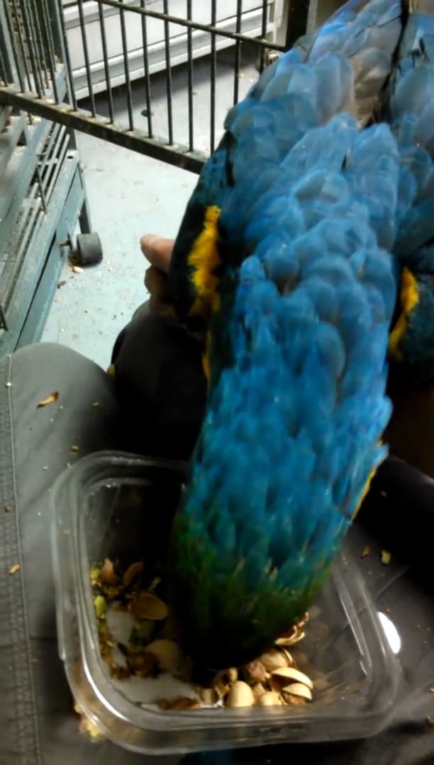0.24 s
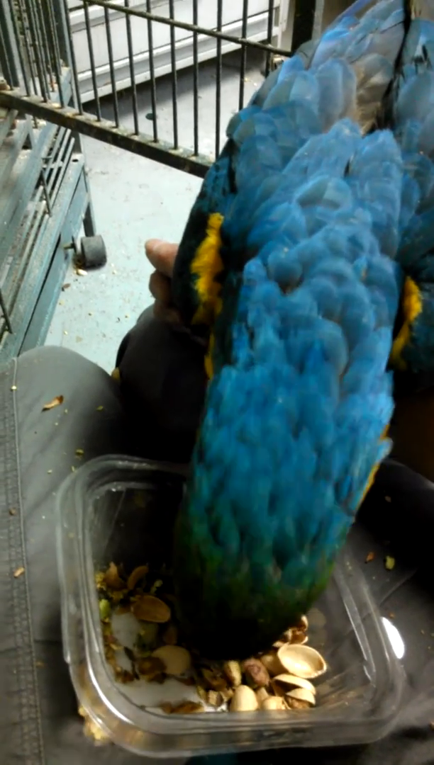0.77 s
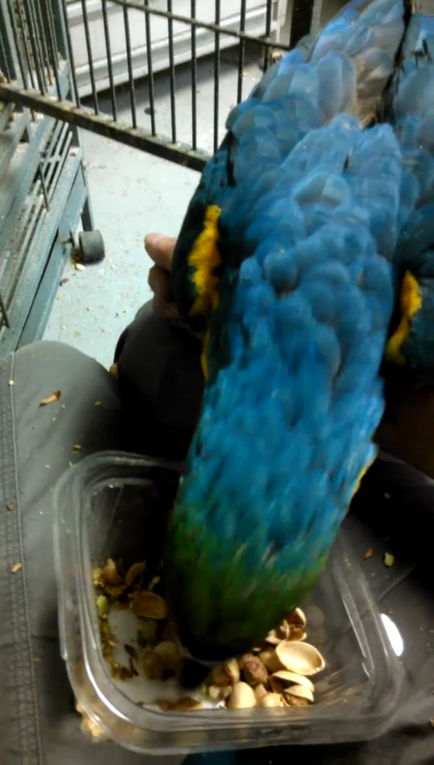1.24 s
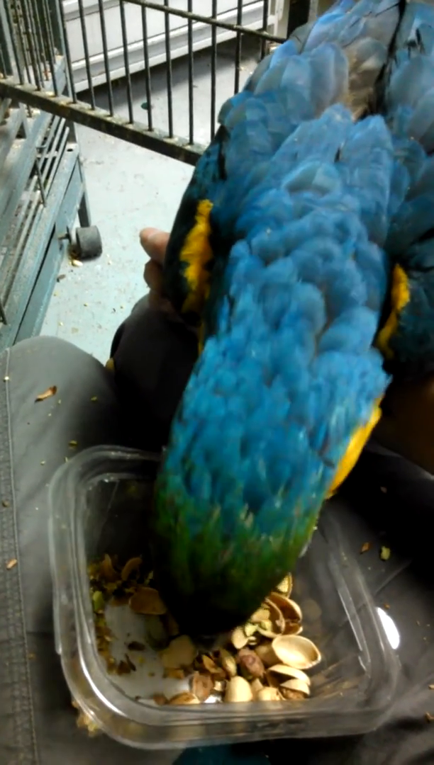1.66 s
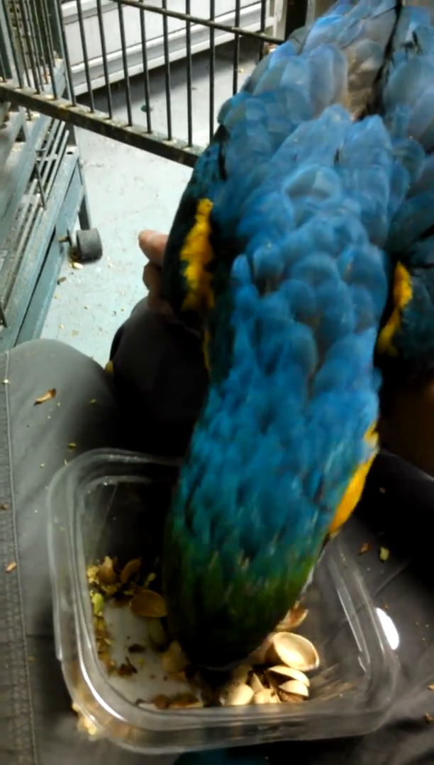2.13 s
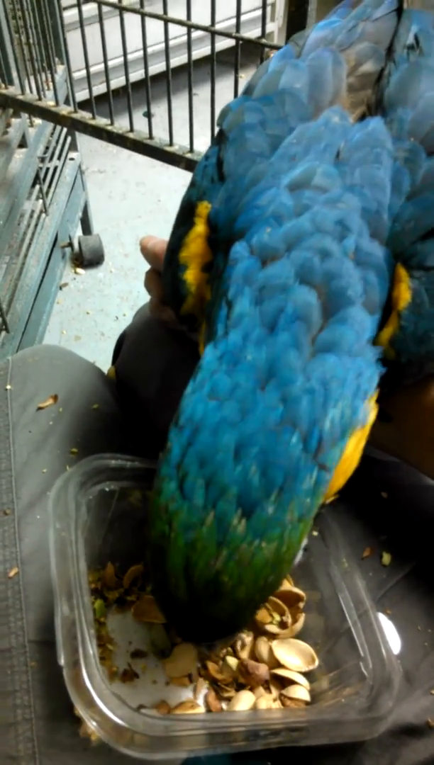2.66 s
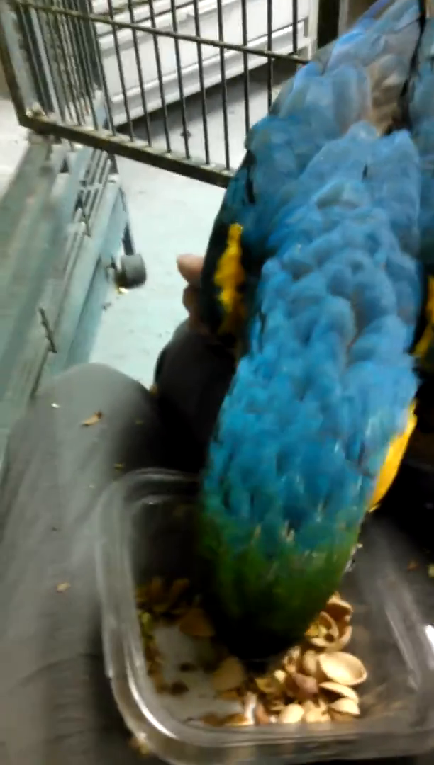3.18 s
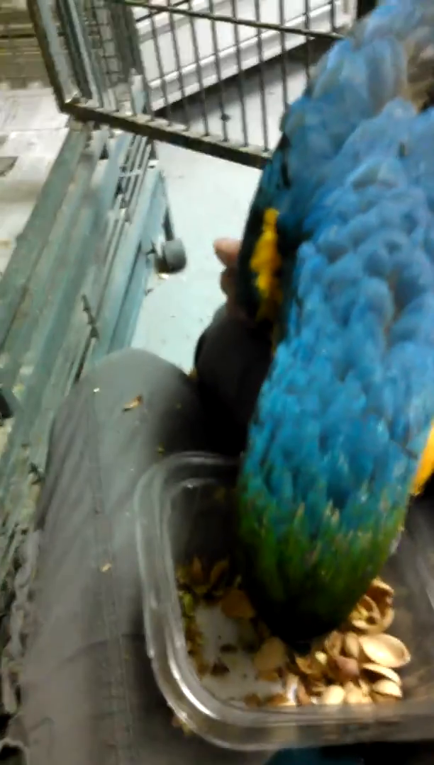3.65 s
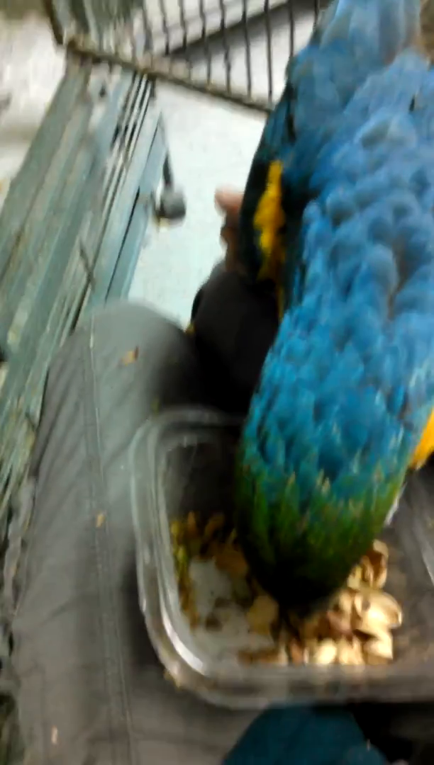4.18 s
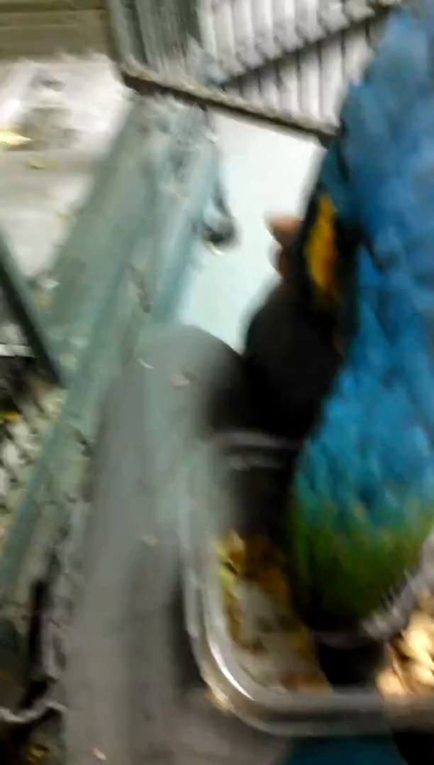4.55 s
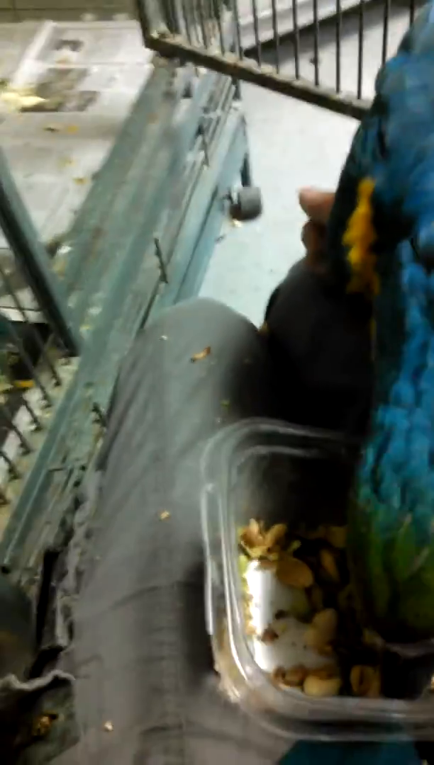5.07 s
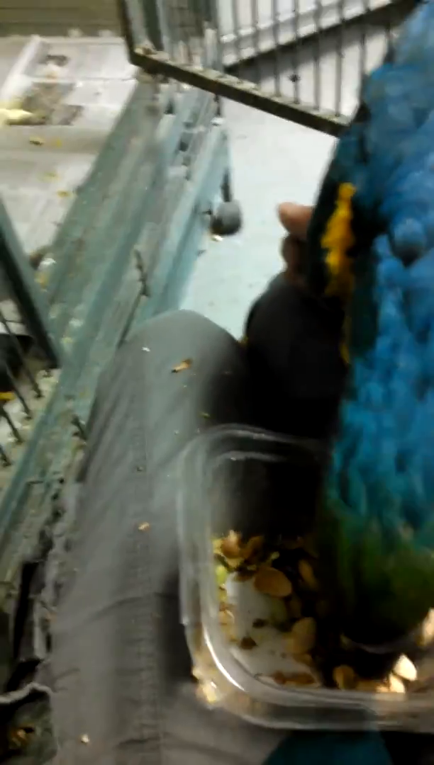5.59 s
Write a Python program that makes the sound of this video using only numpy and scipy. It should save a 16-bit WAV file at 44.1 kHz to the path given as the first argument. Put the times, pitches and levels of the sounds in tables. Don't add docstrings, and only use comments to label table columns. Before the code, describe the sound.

A brief turbulent screech opens, followed by two short chirps, dry rasps and a pure whistle. Three long harsh parrot squawks come next, the last breaking upward from a low note, with chirps and piping between. A gliding mew, a slow flapping growl and a short last call finish. Beak knocks in a plastic tub run through it, close to the microphone in a reverberant hard-walled room.

```python
import sys
import numpy as np
from scipy import signal
from scipy.fft import rfft, irfft, next_fast_len
from scipy.io import wavfile
from scipy.ndimage import uniform_filter1d, minimum_filter1d

SR = 44100
rng = np.random.default_rng(int(sys.argv[2]) if len(sys.argv) > 2 else 0)


def materialize(psi):
    bounded = np.clip(np.atleast_2d(psi).T, -1, 1)
    quanta = np.round(bounded * 32767).astype(np.int16)
    wavfile.write(sys.argv[1], SR, quanta)


def ratio_of_db(decibels):
    return 10 ** (np.asarray(decibels, float) / 20)


N = 256662

# (frequency [Hz], level [dB])
HUSH_SPECTRUM = [(30, -6), (60, -52.5), (120, -62.5), (350, -29.5), (700, -1), (1920, 0.5), (3430, -7.5),
                 (4510, -12), (7090, -23.5), (12000, -42.5)]
# (frequency [Hz], level [dB])
WALL_SIDE = [(60, -1.5), (110, -7), (200, -11), (380, -28), (700, -17), (1290, -19), (2380, -37),
             (4400, -28), (8120, -0.5), (15000, -2.5)]

# (time [s], peak level [dB], pitch [Hz])
TICKS = [
    (0.168, -47, 10800),
    (2.24, -50.5, 11170),
    (2.28, -56, 11140),
    (3.72, -35.5, 14150),
    (3.74, -38, 11670),
    (3.799, -38.5, 9980),
    (4.451, -43, 12200),
    (5.157, -51.5, 11600),
    (5.42, -55, 10500),
    (5.6, -58.5, 11350),
]
# (time [s], peak level [dB], pitch [Hz])
KNOCKS = [(0.55, -34, 497), (0.579, -24.5, 740), (0.609, -35, 503), (0.809, -36.5, 536), (0.988, -36, 675),
          (1.052, -40, 351.2), (1.335, -29.5, 510), (1.377, -21, 780), (2.039, -18.5, 540),
          (2.187, -38.5, 344), (2.239, -32.5, 316), (2.276, -31.5, 402), (2.953, -16, 645),
          (2.989, -10.5, 780), (3.034, -19.5, 610), (3.508, -30, 740), (3.744, -17, 790), (3.768, -12, 594),
          (3.96, -21, 514), (3.979, -13, 810), (4.877, -47, 614)]

# (start [s], length [s], level [dB], flap rate [1/s], treble against bass [dB])
RASPS = [
    (0.339, 0.093, -32, 108, -23),
    (0.466, 0.17, -22, 44, -6),
    (0.789, .3, -22.5, 108, -5.5),
    (1.299, 0.28, -27, 75, -32),
    (2.101, 0.25, -24, 70, -15),
    (3.198, 0.15, -22.5, 120, -12),
    (3.399, .14, -18, 210, -6.5),
    (3.656, 0.33, -25, 111, -11.5),
    (4.449, 0.28, -20, 100, -2.5),
    (4.998, 0.15, -33, 97, -23.5),
]
# (start [s], length [s], level [dB],
# flap rate [1/s], treble against bass [dB])
SCREECH = (0.0, .185, -23, 111, 0)
GROWL = (5.13, 0.6, -24, 27, -5)
# (frequency [Hz], level [dB])
RASP_THROAT = [(150, -79), (330, -45), (782, -13), (908, -21.5), (1140, -9.5), (1310, -2), (1970, -0.5),
               (2070, -6.5), (3030, 5.5), (4980, -12.5), (6180, -18.5), (13000, -46)]
SCREECH_THROAT = [(240, -64), (400, -47), (638, -11), (1360, -17), (1620, -6.5), (2540, -9), (3260, 0.5),
                  (3880, -29.5), (6100, -25), (13000, -52)]
GROWL_THROAT = [(71, -71), (120, -41), (236, -11.5), (509, 0.5), (617, -10), (808, 8), (1530, 1),
                (1850, -10.5), (2040, -0.5), (2470, 6), (4760, -9.5), (5450, -21), (7130, -42),
                (10100, -39), (12000, -73), (15600, -81), (22000, -120)]

# (frequency [Hz], width [Hz], level [dB])
BEAK_MODES = [(520, 90, -22), (1000, 70, -12), (1472, 60, 0), (2290, 80, -4)]
# (start [s], length [s], level [dB])
BEAK_BREATHS = [
    (1.398, 0.706, -17.5),
    (2.33, .86, -26),
]

# (start [s], length [s], crest pitch [Hz], level [dB], roughness [0-1])
CHIRPS = [
    (0.274, .157, 1086, -19, .06),
    (0.566, .14, 1079, -18.5, .09),
]
WHISTLE = [
    (1.045, .29, 1517, -21, .01),
]
WHISTLE_START = [
    (1.078, .1, 1517, -18, .01),
]
ARCHES = [
    (1.13, .165, 1946, -12.5, 0.28),
    (1.14, .13, 2276, -22.5, 0.064),
    (4.422, .14, 1933, -14, 0.22),
    (4.44, .11, 2180, -22, 0.26),
]
LATE_CHIRP = [
    (3.235, .17, 1119, -15.5, 0.15),
]
PIPE = [
    (3.31, 0.14, 1166, -17, 0.057),
    (4.86, .24, 1445, -31.5, .02),
]
FLAT_CHIRP = [
    (3.528, 0.1586, 1092, -13.5, 0.11),
]
BREAK = [
    (3.95, 0.047, 580.4, -9, .12),
]
DUET = [
    (4.0, .46, 900, -15.5, 0.3),
]
MEW = [
    (4.56, .52, 609.8, -21, 0.034),
]
FAR_ARCH = [
    (4.86, .3, 3120, -24, .24),
]
LAST = [
    (5.641, 0.15, 1007, -23, .38),
]
# (pitch climbed [share], pitch dropped [share], crest place [0-1],
# attack [s], release [s])
CHIRP_SHAPE = (.07, 0.028, .4, 0.016, 0.0099)
WHISTLE_SHAPE = (.004, .002, .3, .06, .07)
ARCH_SHAPE = (.12, .13, .45, .025, .02)
LATE_SHAPE = (.07, .07, .4, .03, .03)
PIPE_SHAPE = (0.0017, 0.033, .3, 0.023, .12)
FLAT_SHAPE = (0.073, 0.044, 0.22, 0.028, 0.044)
BREAK_SHAPE = (.001, 0.27, 0.083, 0.026, 0.005)
DUET_SHAPE = (0.0083, .015, 0.25, 0.13, 0.092)
MEW_SHAPE = (-.09, -0.43, .85, 0.076, .17)
FAR_SHAPE = (.3, .13, .62, .04, .05)
LAST_SHAPE = (.001, .02, 0.091, 0.068, .06)
# (frequency [Hz], level [dB])
CHIRP_THROAT = [(700, -67), (1080, -28), (2160, -3), (3250, 1.5), (4350, -2), (5400, -15), (6500, -13),
                (7600, -27), (9800, -26), (12000, -32.5), (14000, -41), (15200, -29.5)]
WHISTLE_THROAT = [(1000, 3), (1500, -4.5), (3050, -7), (4600, -46), (6100, -43), (9000, -81)]
ARCH_THROAT = [(1200, -41), (1900, -14), (2280, -12.5), (3000, -2.5), (3800, 0.5), (4550, -4.5),
               (5200, -23), (9700, -36), (11500, -53.5)]
LATE_THROAT = [(530, -72), (900, -38.5), (2150, -14.5), (2810, -42.5), (3180, 0), (3650, -9.5), (4440, -3),
               (4920, -18.5), (6640, -19.5), (7190, -29.5), (9810, -31), (10800, -41), (14000, -49)]
SOFT_THROAT = [(700, -24), (1170, -17.5), (1420, 9), (2330, -1), (3200, -6.5), (4500, -21.5), (8000, -67)]
MEW_THROAT = [(500, -21), (620, -21), (1240, 1), (1860, -2.5), (2480, -0.5), (3100, 2), (3720, -14.5),
              (4340, -21.5), (4960, -10.5), (5580, -25.5), (7000, -72.5)]
LAST_THROAT = [(290, -67), (500, -27), (991, -5), (1560, -14.5), (2100, -5), (2270, -21), (3650, 1.5),
               (5200, -69), (7000, -101), (9100, -131), (15400, -120)]

# (time [s], pitch [Hz], roughness [0-1])
SQUAWK_A = [
    (1.4, 869.6, 0.3),
    (1.49, 873.3, 0.42),
    (1.75, 918, 0.35),
    (1.9, 962.6, 0.54),
    (2.02, 968, 0.77),
    (2.069, 953, 0.58),
]
SQUAWK_B = [
    (2.31, 880, .3),
    (2.45, 915, .4),
    (2.6, 945, .45),
    (2.8, 960, .5),
    (3.0, 950, .5),
    (3.1, 930, .45),
    (3.19, 875, .45),
]
SQUAWK_C = [
    (3.752, 480, 0.4),
    (3.805, 510.7, 0.013),
    (3.838, 626.8, 0.036),
    (3.864, 806.7, 0.039),
    (3.93, 919, .1),
    (3.99, 950, .3),
    (4.08, 1019, 0.576),
    (4.25, 1002, 0.49),
    (4.399, 879, .5),
]
# (frequency [Hz], level [dB])
THROAT_A = [(600, -25), (900, -13), (1190, -8.5), (1500, -4), (1800, 4), (2200, -5), (2750, -5.5),
            (3800, -4), (4830, -19), (7000, -37.5), (9500, -49), (11500, -53), (13500, -58)]
THROAT_B = [(350, -59), (600, -23), (894, -10), (1460, -12.5), (1840, 1), (2410, -9.5), (3370, -5.5),
            (4140, -13.5), (4640, -23.5), (6570, -34.5), (7870, -64.5), (11900, -52), (13000, -89)]
THROAT_C = [(240, -50), (400, -28), (663, -20), (977, -11), (1180, -15), (1740, -5), (2090, -1.5),
            (2350, -7.5), (3950, -3.5), (4870, -20.5), (6560, -42), (10700, -42.5), (14000, -60.5)]


def unit(x):
    return x / np.sqrt(np.mean(x ** 2) + 1e-18)


def colour(x, points):
    size = next_fast_len(len(x))
    hz, db = np.transpose([(points[0][0] / 2, -120)] + list(points))
    bins_hz = np.arange(size // 2 + 1) * SR / size
    gain = ratio_of_db(np.interp(np.log(bins_hz + 1), np.log(hz), db))
    return irfft(rfft(x, size) * gain, size)[:len(x)]


def lowpass(x, order, hz):
    return signal.lfilter(*signal.butter(order, hz, fs=SR), x)


def wobble(count, hz):
    return unit(lowpass(rng.standard_normal(count), 2, hz))


def read(rows):
    s, *columns = np.transpose(rows)
    first = int(s[0] * SR)
    n = np.arange(first, max(int(s[-1] * SR), first + 500))
    return first, [np.interp(n / SR, s, c) for c in columns]


def envelope(t, db, attack_s, release_s, fade_db):
    opening = np.clip(1 - (t - t[0]) / attack_s, 0, 1)
    closing = np.clip(1 - (t[-1] - t) / release_s, 0, 1)
    return db - fade_db * (opening + closing)


def wall_echoes(t):
    noise = rng.standard_normal(len(t))
    low = lowpass(noise, 1, 2660)
    tail = low * ratio_of_db(-60 * t / 0.47) + (noise - low) * ratio_of_db(-60 * t / 0.23)
    return tail * (t > .003) / np.sqrt(np.sum(tail ** 2))


def add(out, start, sound, db, wet_db):
    loudness = np.sqrt(uniform_filter1d(sound ** 2, size=1500) + 1e-12)
    n = np.arange(len(sound))
    edge = np.minimum(1, np.minimum(n, n[::-1]) / 250)
    sound = sound / loudness * ratio_of_db(db) * edge
    t = np.arange(SR // 2) / SR
    direct = np.arange(len(t)) == 0
    mid = ratio_of_db(wet_db) * wall_echoes(t) + direct
    side = ratio_of_db(wet_db + 5.0) * colour(wall_echoes(t), WALL_SIDE)
    pair = np.array([mid + side, mid - side]) / np.sqrt(1 + ratio_of_db(wet_db) ** 2)
    heard = signal.fftconvolve(pair, sound[None], axes=1)[:, :N - start]
    out[:, start:start + heard.shape[1]] += heard


def room_hush():
    return np.array([unit(colour(rng.standard_normal(N), HUSH_SPECTRUM)) for _ in range(2)]) * ratio_of_db(-55)


def add_knocks(out, rows, t60_s, spread):
    t = np.arange(SR // 8) / SR
    for s, db, hz in rows:
        band = signal.butter(2, [hz / spread, min(hz * spread, 16000)], "band", fs=SR)
        noise = rng.standard_normal(len(t)) + 0.44 * rng.standard_normal((2, len(t)))
        ring = signal.lfilter(*band, noise) * ratio_of_db(-60 * t / t60_s) * (1 - np.exp(-t / 0.0018))
        start = int(s * SR)
        out[:, start:start + len(t)] += ring / np.abs(ring).max() * ratio_of_db(db)


def puff(row, attack, release, fade_db):
    start_s, length_s, db, *steady = row
    t = start_s + np.arange(0, 1, .01) * length_s
    level = envelope(t, db, attack * length_s, release * length_s, fade_db)
    return np.transpose([t, level] + [t * 0 + v for v in steady])


def rattle(out, rows, throat, flap_s, uneven, wet_db):
    start, (db, rate, tilt_db) = read(rows)
    phase = np.cumsum(rate * (1 + uneven * wobble(len(rate), 30))) / SR
    since_flap_s = phase % 1 / rate
    flap = uniform_filter1d(np.exp(-since_flap_s / flap_s), size=30)
    air = colour(rng.standard_normal(len(rate)), throat)
    low = lowpass(air, 4, 1700)
    bass = low * (flap + 0.18)
    treble = (air - low) * (.5 * flap + 0.59) * ratio_of_db(tilt_db)
    add(out, start, bass + treble, db, wet_db)


def beak(out, rows):
    start, (db,) = read(rows)
    air = rng.standard_normal(len(db))
    ring = 0
    for hz, width, mode_db in BEAK_MODES:
        peak = signal.iirpeak(hz, hz / width, fs=SR)
        ring = ring + ratio_of_db(mode_db) * unit(signal.lfilter(*peak, signal.lfilter(*peak, air)))
    add(out, start, ring, db, wet_db=-5.5)


def voice(out, rows, throat, jitter=0.0913, shimmer=3.35, breath=0.59, wet_db=0., open_hz=300):
    start, (hz, db, rough) = read(rows)
    rough = np.clip(rough, 0, 1)
    shake = 1 + jitter * rough * wobble(len(hz), 163.0) + 0.00411 * wobble(len(hz), 20.4)
    phase = 2 * np.pi * np.cumsum(hz * shake) / SR
    shut = 5 * np.clip(1 - hz / open_hz, 0, 1)
    tone = sum(np.cos(k * phase + k * k) * k ** -shut * (k * hz < 15500) for k in range(1, 17))
    tone = tone * (1 + shimmer * rough * wobble(len(hz), 390))
    hiss = signal.lfilter(*signal.butter(1, 2600, "high", fs=SR), rng.standard_normal(len(hz)))
    air = breath * rough * hiss * (1 + np.cos(phase))
    add(out, start, colour(unit(tone) + air, throat), db, wet_db)


def arch(row, shape, yap=0):
    start_s, length_s, hz, db, rough = row
    climb, drop, crest, attack_s, release_s = shape
    u = np.arange(0, 1, .005)
    t = start_s + u * length_s
    below = climb * np.clip(1 - u / crest, 0, 1) ** 2
    beyond = drop * np.clip((u - crest) / (1 - crest), 0, 1) ** 2
    flick = yap * np.clip(1 - (t[-1] - t) / 0.02, 0, 1)
    level = envelope(t, db, attack_s, release_s, fade_db=15.5) + 7 * np.clip(2 * flick, 0, 1)
    return np.transpose([t, hz * (1 - below - beyond - 0.09 * flick ** 2), level, rough * (1 + flick)])


def squawk(path):
    s, hz, rough = np.transpose(path)
    t = np.arange(s[0], s[-1], .002)
    hz = np.interp(t, s, hz)
    db = -10 + 3.2 * np.log2(hz / 950)
    level = envelope(t, db, attack_s=0.04, release_s=0.015, fade_db=15.5)
    return np.transpose([t, hz, level, np.interp(t, s, rough)])


def scene():
    out = room_hush()
    add_knocks(out, TICKS, t60_s=.12, spread=1.08)
    add_knocks(out, KNOCKS, t60_s=0.14, spread=1.65)
    for row in RASPS:
        rattle(out, puff(row, 0.2, 0.74, fade_db=7), RASP_THROAT, flap_s=0.027, uneven=.25, wet_db=-2.5)
    rattle(out, puff(SCREECH, .01, .3, fade_db=14), SCREECH_THROAT, flap_s=0.0064, uneven=0.13, wet_db=-12)
    rattle(out, puff(GROWL, .1, .08, fade_db=14), GROWL_THROAT, flap_s=.011, uneven=.2, wet_db=-3.)
    for row in BEAK_BREATHS:
        beak(out, puff(row, 0.081 / row[1], 0.03 / row[1], fade_db=15.5))
    for rows, shape, throat, wet_db in [
            (WHISTLE, WHISTLE_SHAPE, WHISTLE_THROAT, 3.0),
            (WHISTLE_START, FLAT_SHAPE, MEW_THROAT, -3.0),
            (LATE_CHIRP, LATE_SHAPE, LATE_THROAT, -3.0),
            (PIPE, PIPE_SHAPE, SOFT_THROAT, 5.0),
            (FLAT_CHIRP, FLAT_SHAPE, LATE_THROAT, -3.0),
            (BREAK, BREAK_SHAPE, SOFT_THROAT, -3.0),
            (DUET, DUET_SHAPE, THROAT_B, -4.5),
            (MEW, MEW_SHAPE, MEW_THROAT, 0.6),
            (FAR_ARCH, FAR_SHAPE, SOFT_THROAT, 3.0),
            (LAST, LAST_SHAPE, LAST_THROAT, 11.0)]:
        for row in rows:
            voice(out, arch(row, shape), throat, wet_db=wet_db)
    for row in ARCHES:
        voice(out, arch(row, ARCH_SHAPE), ARCH_THROAT, jitter=.05, shimmer=1.5, breath=.3, wet_db=0.)
    for row in CHIRPS:
        course = arch(row, CHIRP_SHAPE, yap=1)
        voice(out, course, CHIRP_THROAT, jitter=0.065, shimmer=0.9, breath=.1, wet_db=5.5)
    voice(out, squawk(SQUAWK_A), THROAT_A, jitter=.06, shimmer=1.9, breath=1.7, wet_db=.5)
    voice(out, squawk(SQUAWK_B), THROAT_B, jitter=.095, shimmer=1.9, breath=1.8, wet_db=-1.)
    voice(out, squawk(SQUAWK_C), THROAT_C, jitter=.075, shimmer=1.8, breath=2.4, wet_db=-3., open_hz=700)
    return out


def port_cavity(x):
    late = np.append(np.zeros(round(0.00161 * SR)), x.mean(axis=0))[:N]
    echo = 0.089 * lowpass(late, 2, 3000)
    ring = 0.66 * signal.lfilter(*signal.iirpeak(1190, 2.16, fs=SR), late)
    return np.array([echo + ring, -echo - ring])


def limiter(x):
    need = np.minimum(1, 0.71 / (np.abs(x) + 1e-9))
    gain = minimum_filter1d(need, size=17, axis=1)
    gain = uniform_filter1d(uniform_filter1d(gain, size=9, axis=1), size=9, axis=1)
    return x * gain


def roll_off(x):
    return signal.sosfilt(signal.butter(12, 15400, fs=SR, output="sos"), x)


def record(dry):
    heard = signal.sosfilt(signal.butter(4, 190, "high", fs=SR, output="sos"), dry)
    mix = limiter(heard + port_cavity(heard))
    return roll_off(mix)


dry = scene()
out = record(dry)
materialize(out)
```